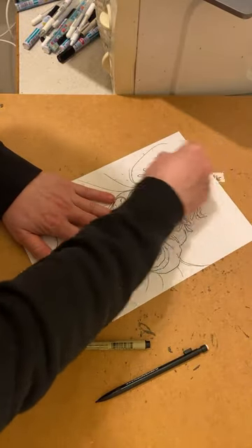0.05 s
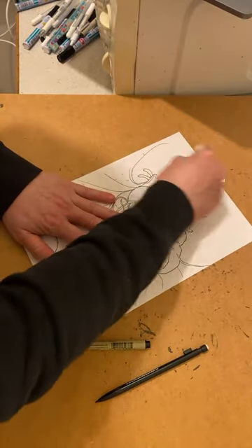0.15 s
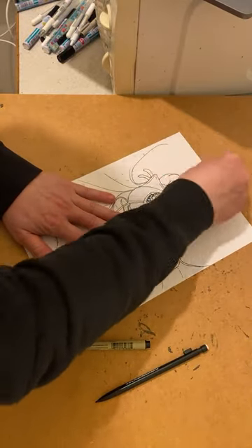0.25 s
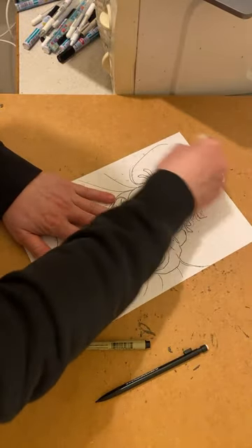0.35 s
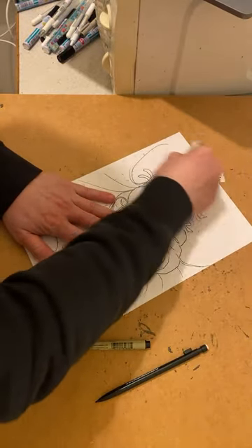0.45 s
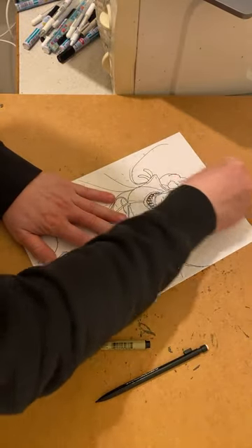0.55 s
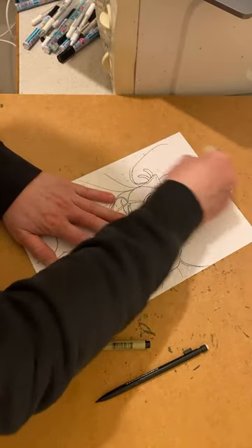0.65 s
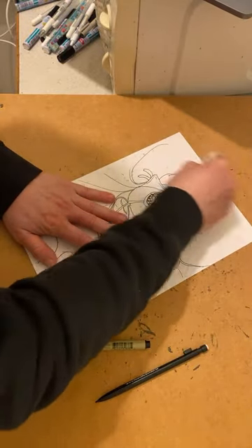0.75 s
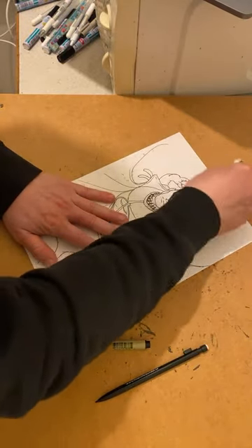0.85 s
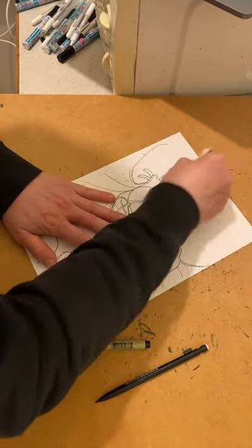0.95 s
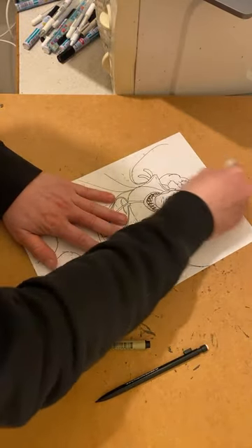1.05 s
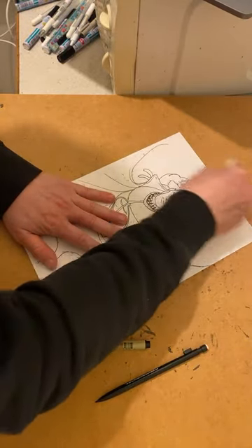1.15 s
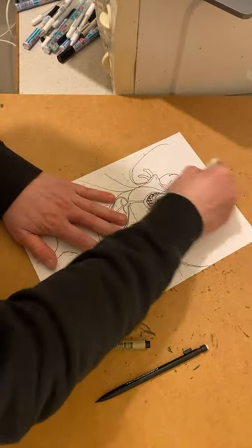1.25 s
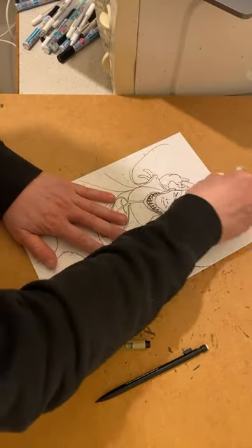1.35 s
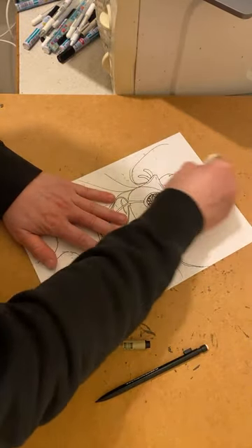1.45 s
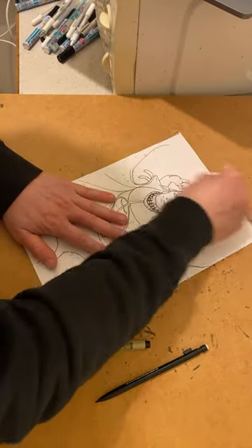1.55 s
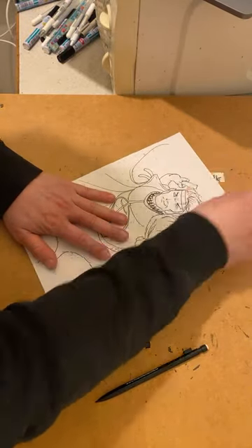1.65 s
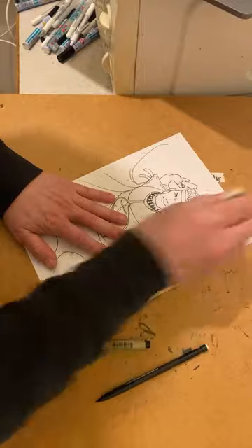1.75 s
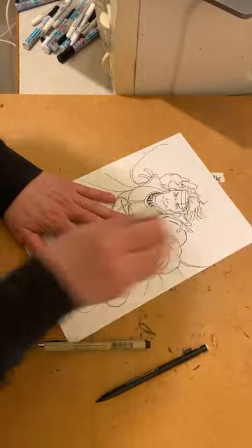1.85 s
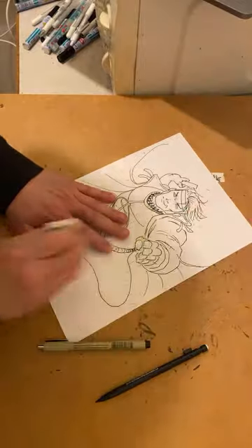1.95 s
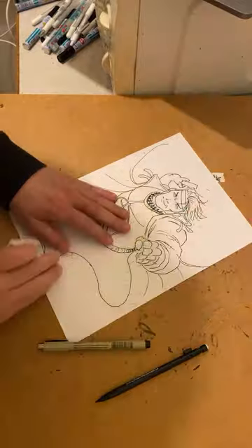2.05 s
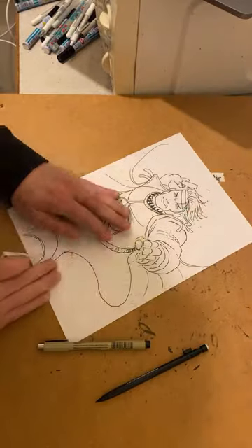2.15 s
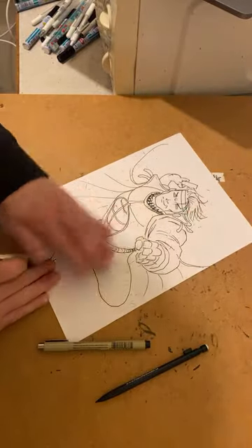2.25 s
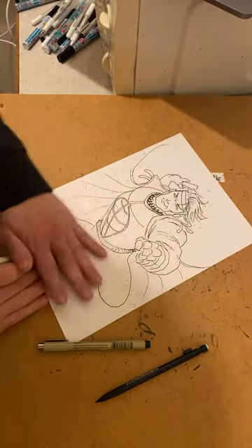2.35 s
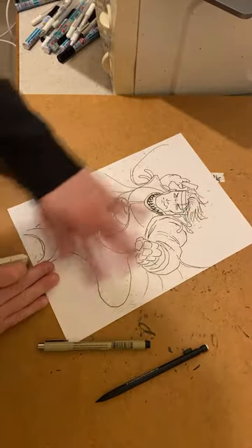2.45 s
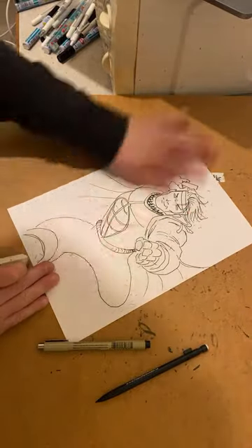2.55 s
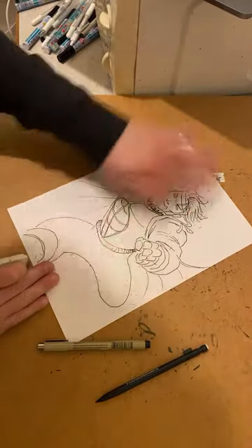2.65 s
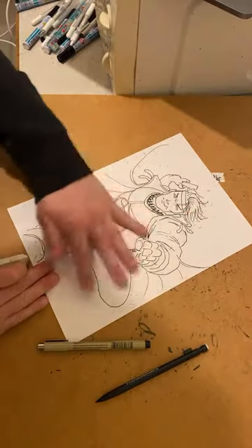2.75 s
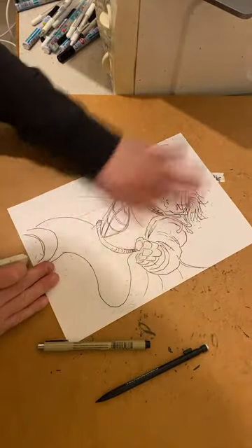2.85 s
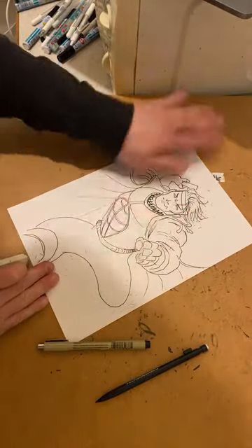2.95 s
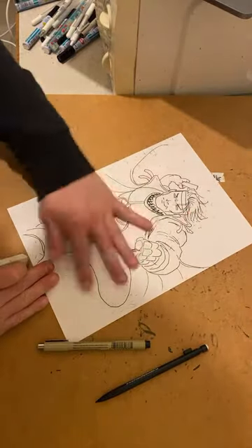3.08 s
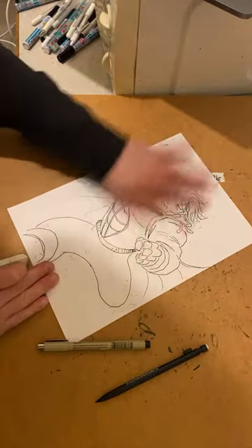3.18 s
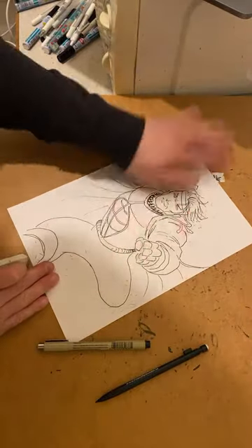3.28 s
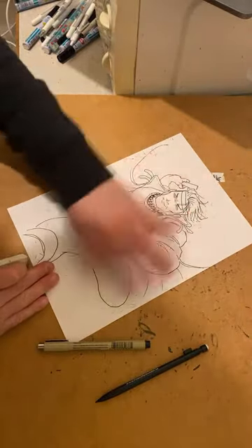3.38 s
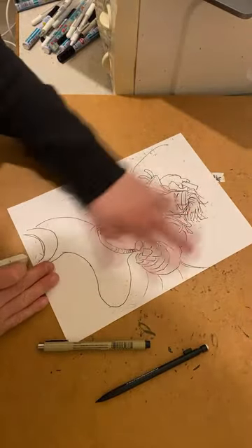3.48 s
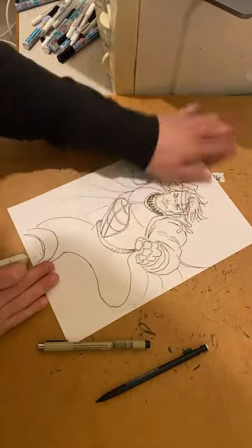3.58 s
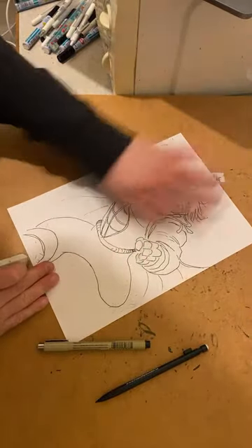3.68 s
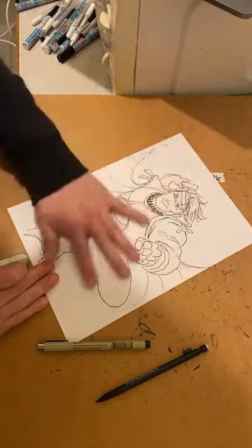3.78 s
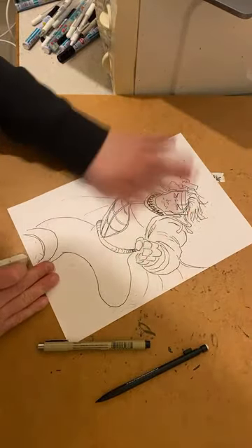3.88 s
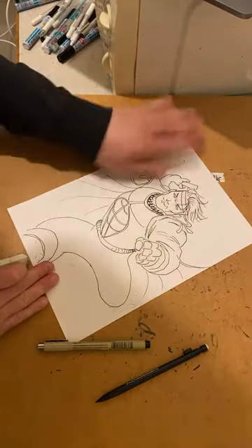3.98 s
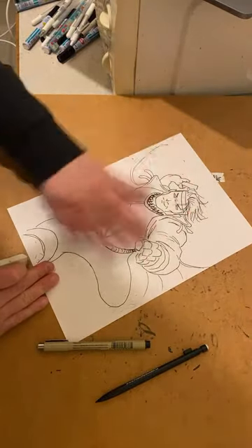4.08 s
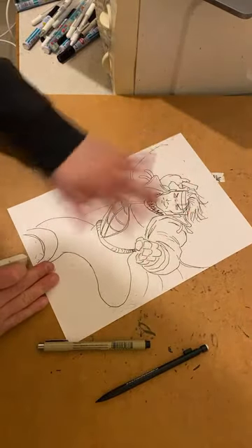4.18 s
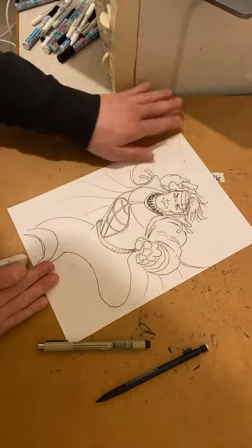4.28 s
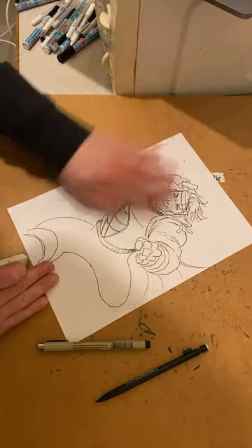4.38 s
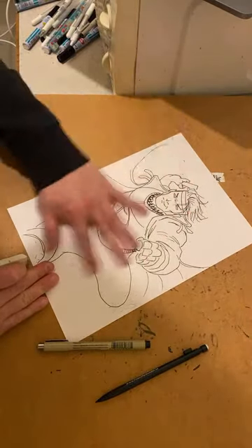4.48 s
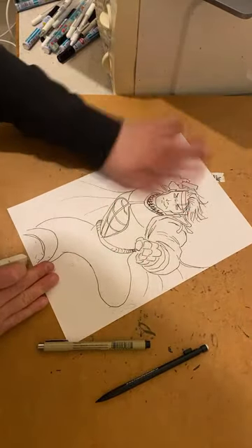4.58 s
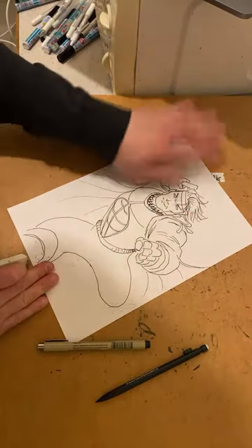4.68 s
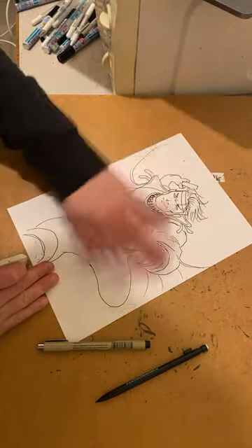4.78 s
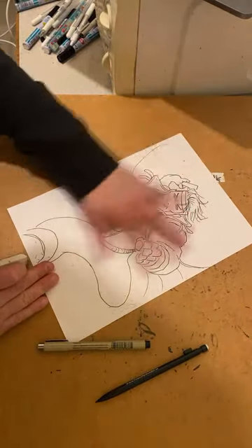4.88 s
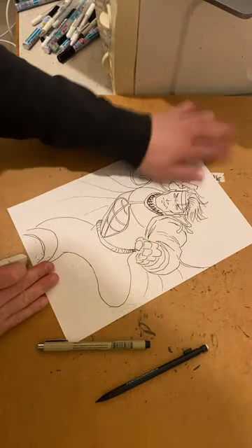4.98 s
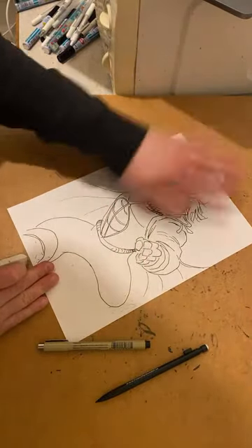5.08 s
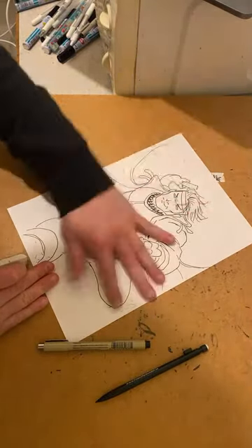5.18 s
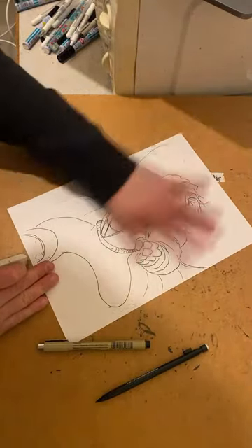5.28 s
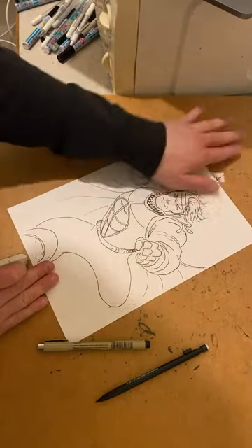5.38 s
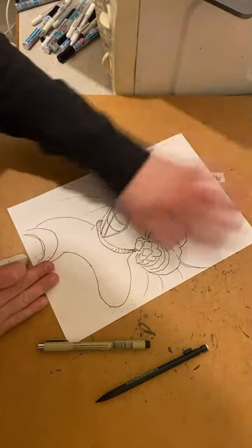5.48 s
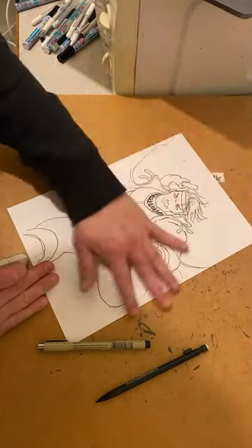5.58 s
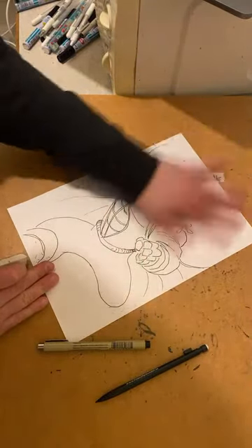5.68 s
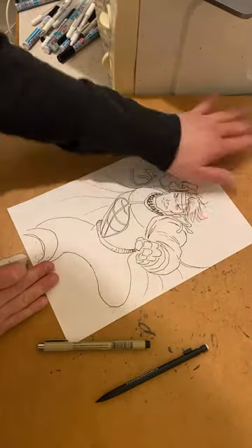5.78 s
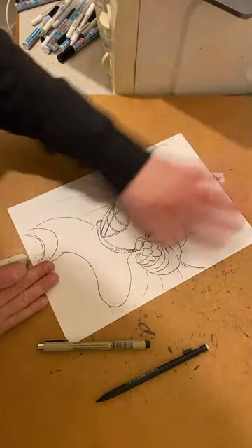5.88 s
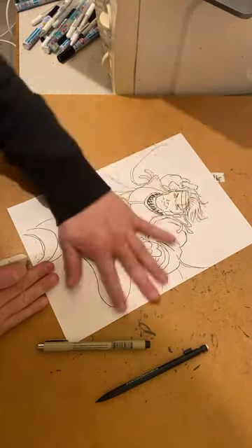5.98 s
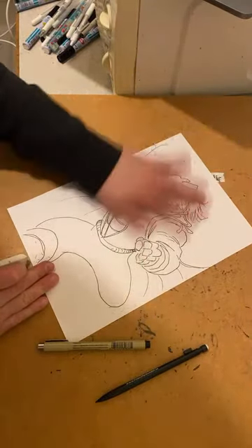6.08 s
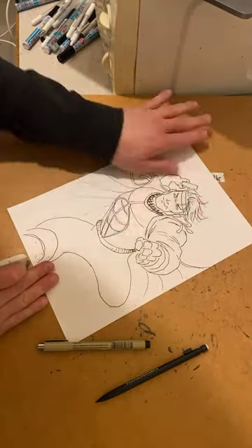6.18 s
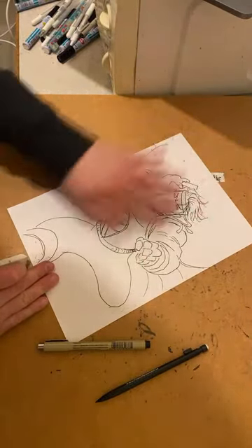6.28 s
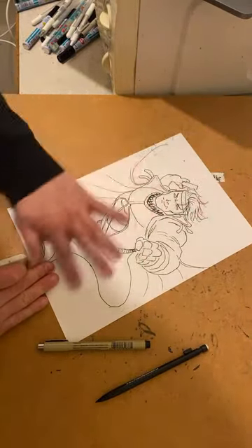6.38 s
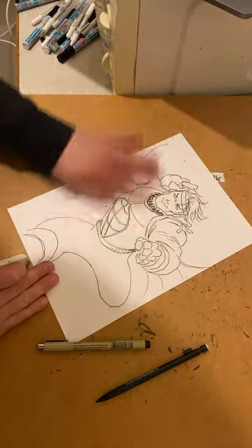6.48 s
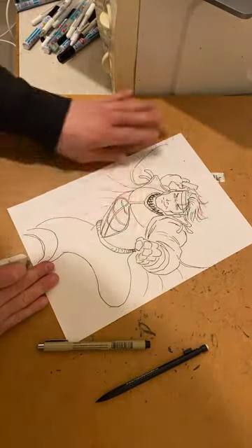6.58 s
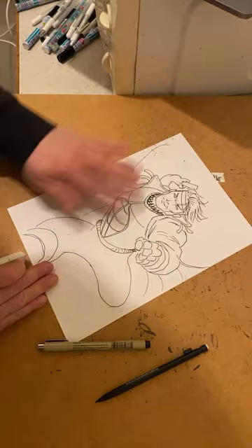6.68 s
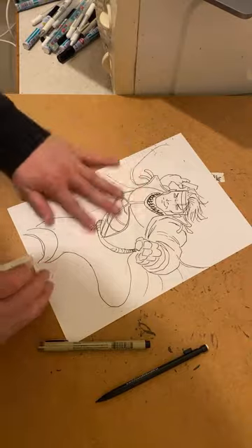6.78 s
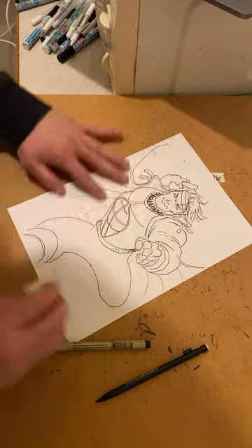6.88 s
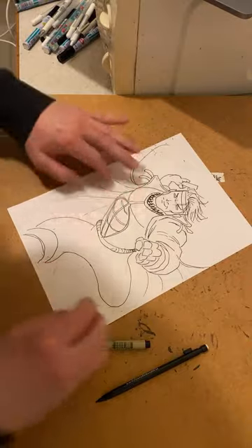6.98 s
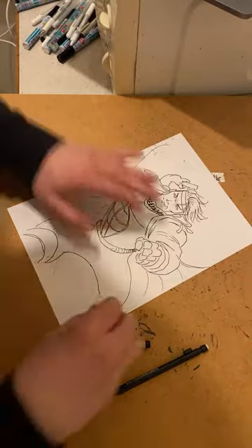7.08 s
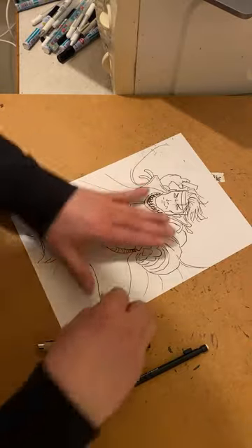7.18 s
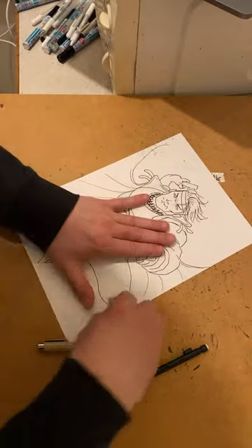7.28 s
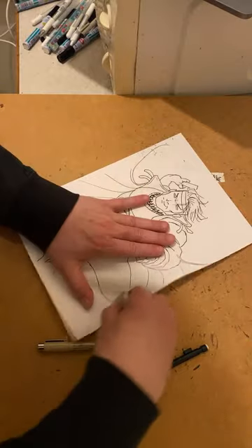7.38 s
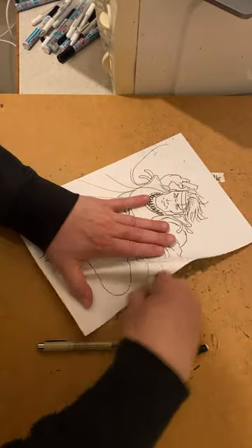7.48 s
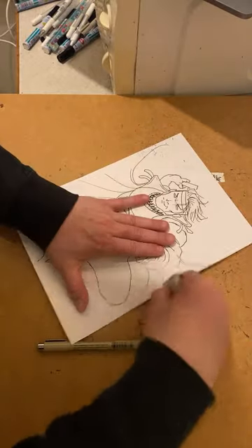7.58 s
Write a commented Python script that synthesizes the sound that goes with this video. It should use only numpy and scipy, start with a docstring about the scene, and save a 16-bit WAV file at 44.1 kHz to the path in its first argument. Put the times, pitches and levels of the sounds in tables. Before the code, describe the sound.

From the start, an eraser rubs over paper in about six quick, gritty strokes, each making the wooden desk knock and something loose rattle slightly. The sound cuts out for an instant near 0.8 and 1.5 seconds, returning with a low thump. At 1.6 seconds the sheet slips with a short rasp, and a faint tap follows at 2 seconds. From about 2.4 to 7 seconds a hand brushes across the paper roughly three times a second, each sweep a dry hiss, most starting with a soft pat and a low rumble from the desk. Another tiny dropout comes near 3.9 seconds. After a faint tap at 7.2 seconds, the hand lands on the sheet and slides it round, with a crisp scrape and buckle around 7.5 seconds. Everything is heard close up in a small, quiet room with a faint hum.

```python
"""A small, quiet room with a faint hum, heard in mono close to a wooden desk.
An eraser crosses drawing paper in six quick strokes; each bite is an impact that excites the desk's modes.
A hand then sweeps the crumbs away, landing softly and hissing over the sheet, and at last slides it round.
Rubber, skin and paper sound by stick-slip friction: noise whose level follows the speed of sliding.
Two light taps are heard. Three times the sound cuts out for an instant and comes back with a low thump."""
import sys
import numpy as np
from scipy import signal
from scipy.fft import rfft, irfft, next_fast_len
from scipy.io import wavfile
from scipy.ndimage import uniform_filter1d

SR = 44100
rng = np.random.default_rng(int(sys.argv[2]) if len(sys.argv) > 2 else 0)


def generate_wav(sig):
    """Save sig (samples, or channels by samples) to the path in sys.argv[1] as 16-bit PCM at SR."""
    pcm = np.round(np.clip(np.atleast_2d(sig).T, -1, 1) * 32767).astype(np.int16)
    wavfile.write(sys.argv[1], SR, pcm)


N = 336432
TIME = np.arange(N) / SR
AGE = np.arange(SR * 3 // 4) / SR  # time since the onset of one event [s]


# eraser strokes; the first is already dying away at time zero:
# (time [s], relative force [dB], time to full speed [s], relative rub level [dB])
ERASER_STROKES = [(-0.2, -3, 0.14, 4), (0.1232, -0.5, 0.14, 0.5), (0.4604, -.5, 0.08, 3),
                  (0.7494, -1, .09, 0), (1.0157, 2.5, .085, 0), (1.2666, -0.5, .09, -0.5),
                  (1.539, -2, 0.053, 1)]

def eraser_knocks(boom_db=-40.5, knock_db=-26, top_db=-40, hardening=1.56, clack_after_s=0.0085):
    """Impact excitation: each gritty bite rings the desk; contact stiffens with force, adding treble."""
    shared_top = desk_top(early_t60=0.55, late_t60=0.55, late_db=12)  # the bites fall near one spot
    clack, rattle = loose_object(clack_after_s)
    out = np.zeros(N)
    for s, force_db, _, _ in ERASER_STROKES:
        boom, knock = desk_modes(vary_db=1.1, damp_db_per_s=12)
        body = amp(boom_db) * unit_blow(boom) + amp(knock_db) * unit_blow(knock)
        top = unit_blow(shared_top + 0.5 * desk_top(early_t60=0.37, late_t60=0.44, late_db=23))
        grit = noise(RUBBER_SPECTRUM, len(AGE)) * np.exp(-AGE / 0.0031)
        top_gain = amp(top_db + hardening * force_db)
        add(out, s, amp(force_db) * body)
        add(out, s, top_gain * (top + amp(16) * clack + amp(-12) * grit))
        add(out, s + clack_after_s, top_gain * amp(-3) * rattle)
    return out


# normal modes of the desk: (frequency [Hz], relative level [dB], 60 dB decay time [s])
DESK_MODES = [(97.8, -17.5, 0.2), (118.2, -16, 0.63), (158, -11.5, 0.23), (169.2, -34, 0.94),
              (258.2, -20.5, 0.23), (278.7, -22, 0.36), (320.3, -6, 0.16), (331.3, -26, 0.78),
              (348.3, -16.5, 0.45), (374, -18, 0.44), (406, -5.5, 0.027), (410.7, -20.5, 0.52),
              (434.7, -27.5, 0.95), (439.9, -0.5, 0.1), (467, -19.5, 0.47), (489, -23, 0.46),
              (491, -22, 0.63), (547, -23.5, 0.5), (606.6, -30, 0.33)]

def desk_modes(soft_db_per_octave=0, vary_db=0, damp_db_per_s=0):
    """Modal superposition: damped sines form a boom and a knock; a leaning arm adds damping."""
    hz, db, t60 = np.transpose(DESK_MODES)[:, :, None]
    db = db + vary_db * rng.standard_normal(db.shape)  # each spot favours other modes
    sign = (-1) ** np.arange(len(hz))[:, None]  # neighbours swing opposite ways, so the ring builds up
    decay = amp(db - soft_db_per_octave * np.log2(hz) - (60 / t60 + damp_db_per_s) * AGE)
    rise = 1 - np.exp(-AGE * hz)  # about one cycle
    modes = sign * rise * decay * np.sin(2 * np.pi * hz * AGE)
    low = hz[:, 0] < 200
    return modes[low].sum(0), modes[~low].sum(0)


# crowded upper modes of the desk: (frequency [Hz], relative spectral density [dB])
DESK_TOP_SPECTRUM = [(450, -7), (620, 2), (800, 6), (950, 0), (1200, 2.5), (1550, -2.5), (1950, -8),
                     (2500, -14), (3500, -22.5), (5500, -29.5), (9000, -56), (16000, -55)]

def desk_top(early_t60, late_t60, late_db):
    """Modal overlap: dense modes merge into noise, with an early fall and a late ring in the room."""
    fall = amp(-60 * AGE / early_t60) + amp(late_db - 60 * AGE / late_t60)
    rise = 1 - np.exp(-AGE / 0.00055)
    return unit_blow(noise(DESK_TOP_SPECTRUM, len(AGE)) * fall * rise)


# something loose on the desk: (frequency [Hz], relative spectral density [dB])
RATTLE_SPECTRUM = [(850, -35), (1150, 0), (1350, -3), (1550, 0), (1750, -6), (2100, -25), (4000, -50),
                   (8000, -80)]

def loose_object(clack_after_s, clack_hz=1250, clack_s=0.0013, rattle_t60=0.06):
    """Contact chatter: a jolted object gives a delayed clack and a brief rattle."""
    clack = np.exp(-((AGE - clack_after_s) / clack_s) ** 2) * np.sin(2 * np.pi * clack_hz * AGE)
    envelope = np.minimum(AGE / 0.002, 1) * amp(-60 * AGE / rattle_t60)
    return clack, unit_blow(noise(RATTLE_SPECTRUM, len(AGE)) * envelope)


# rubber on paper: (frequency [Hz], relative spectral density [dB])
RUBBER_SPECTRUM = [(300, -33), (900, 14.5), (2000, 3.5), (3200, 0.5), (5000, 1), (7000, -3.5), (10000, -4),
                   (13000, -7.5), (16000, -10)]

def eraser_rub(level_db=-54.5):
    """Sliding friction: after each bite the rubber radiates power as the square of its speed."""
    power = np.zeros(N)
    for s, _, peak_s, rub_db in ERASER_STROKES:
        speed = stroke(peak_s, start_db=-12, stop_s=0.055)
        add(power, s, (amp(level_db + rub_db) * speed) ** 2)
    return lingering(power, share=0.47, t60=0.31) * friction(RUBBER_SPECTRUM, grain_db=3, flutter_db=0)


# skin on paper, and the hollow rush under the palm: (frequency [Hz], relative spectral density [dB])
SKIN_SPECTRUM = [(400, -0.5), (900, -6), (1800, -2.5), (3000, -0.5), (4800, 1), (6500, -1.5), (8500, 0.5),
                 (11000, -0.5), (13500, -2), (16000, -7)]
PALM_SPECTRUM = [(300, -12), (600, -8), (850, 1.5), (1250, 4), (1700, 2.5), (2400, -1), (4000, -7)]
# sweeps of the hand, in relative levels; a landing of -40 dB or less glides in with no audible pat:
# (time [s], time to full speed [s], hiss [dB], landing [dB], weight on the palm [dB])
HAND_SWEEPS = [(1.92, .18, -16.5, -40, -1.5), (2.372, .18, 0.5, -57, 8), (2.818, 0.069, 1.5, 4, 0.5),
               (3.125, .1, 0.5, -3.5, 0), (3.464, 0.093, 0, -2, 5), (3.809, .11, -2, 6, -2),
               (4.166, 0.079, -1, -0.5, -3.5), (4.498, 0.1, -2, -5.5, -1.5),
               (4.871, 0.093, -0.5, -1.5, -1.5), (5.234, 0.11, 0, -0.5, 0), (5.64, 0.077, -.5, -1.5, 3),
               (6.018, 0.11, -3, .5, 6), (6.425, 0.069, -2, -8, 2), (6.804, 0.079, -8, 7, -8)]
BOOM_PER_LANDING = 0.46  # growth of the desk's boom with the landing [dB per dB]

def hand_sweeps(level_db=-44, contact_db=-13.5, rush_per_weight=0.78, rumble_per_weight=0.67):
    """Friction under load: skin hisses, a heavier palm adds a rush, and the driven desk rumbles."""
    skin, palm, drag = np.zeros((3, N))
    for s, peak_s, hiss_db, landing_db, weight_db in HAND_SWEEPS:
        start_db = np.clip(contact_db + 0.83 * landing_db, -29.5, 0)  # a harder landing starts faster
        slide = amp(level_db + hiss_db) * stroke(peak_s, start_db, stop_s=0.065)
        load_db = level_db - 3 + BOOM_PER_LANDING * landing_db + rumble_per_weight * weight_db
        add(skin, s, slide ** 2)
        add(palm, s, (slide * amp(rush_per_weight * weight_db - 3)) ** 2)
        add(drag, s, (amp(load_db) * stroke(peak_s=0.057, start_db=contact_db, stop_s=0.059)) ** 2)
    hiss = lingering(skin) * friction(SKIN_SPECTRUM, grain_db=2, flutter_db=-0.1)
    rush = lingering(palm) * friction(PALM_SPECTRUM, grain_db=1, flutter_db=2)
    boom, _ = desk_modes()
    rumble = lingering(drag) * unit(signal.fftconvolve(rng.standard_normal(N), boom)[:N])
    return hiss + rush, rumble


# the pat of flesh on paper: (frequency [Hz], relative spectral density [dB])
PAT_SPECTRUM = [(170, -21), (250, 3), (320, 12), (420, -12), (560, -1), (750, -13.5), (1000, -9.5),
                (2000, -43)]
# the hand is set down to hold the sheet: (time [s], relative landing [dB], relative weight [dB])
HAND_HOLDS = [(2.208, -15.5, 2.5), (7.318, -7, 0), (7.347, 9, -7)]

def hand_landings(boom_db=-47.5, knock_db=-50.5, top_db=-55.5, pat_db=-48.5):
    """Compliant impact: flesh cushions the blow, the fingers patter, and the weight rocks the desk."""
    graze_s, finger_spread_s, heel_s = 0.00402, 0.02237, 0.0054
    landings = [(s + graze_s, landing_db, weight_db) for s, _, _, landing_db, weight_db in HAND_SWEEPS]
    out = np.zeros(N)
    for s, landing_db, weight_db in landings + list(HAND_HOLDS):
        boom, knock = desk_modes(soft_db_per_octave=3, vary_db=4.5, damp_db_per_s=20)
        patter = knock.copy()
        for delay, size in rng.random((4, 2)):
            add(patter, delay * finger_spread_s, 0.4 * size * knock)
        give = 1 - np.exp(-AGE / (0.0085 * amp(-landing_db)))  # gentle landings flatten flesh slowly
        pat = unit_blow(noise(PAT_SPECTRUM, len(AGE)) * give * amp(-60 * AGE / 0.38))
        top = unit_blow(give * desk_top(early_t60=0.25, late_t60=0.69, late_db=-10.5))
        touch = amp(knock_db) * unit_blow(give * patter) + amp(pat_db) * pat + amp(top_db) * top
        add(out, s, amp(landing_db) * touch)
        add(out, s + heel_s, amp(boom_db + BOOM_PER_LANDING * landing_db + weight_db) * unit_blow(boom))
    return out


# paper scraping on wood, and paper buckling: (frequency [Hz], relative spectral density [dB])
SCRAPE_SPECTRUM = [(300, -9), (900, -1), (1600, -1), (2200, -5.5), (2900, 0.5), (3400, 0.5), (4200, -3.5),
                   (4700, -1.5), (5200, 0.5), (6200, -3), (8000, -4.5), (10500, -9.5), (13000, -10.5),
                   (16000, -20)]
BUCKLE_SPECTRUM = [(1500, -30), (2400, -18), (2900, 6), (3500, -7), (4200, 2), (4700, -5), (5300, 1),
                   (6200, -14), (10000, -24)]
# the sheet slips under the last stroke, then is pulled round; a curve each: (time [s], relative level [dB])
SLIDE_CURVES = [
    [(1.56, -68), (1.578, -60), (1.63, -47.5), (1.758, -67.5), (1.85, -78)],
    [(7.29, -91), (7.32, -71), (7.398, -79), (7.424, -54), (7.454, -42.5), (7.494, -42.5), (7.532, -47),
     (7.629, -51)],
]
# the sheet buckles under the eraser, and as its edge lifts: (time [s], level [dB])
SHEET_BUCKLES = [(1.612, -48.5), (7.41, -48), (7.447, -38.5)]

def sheet_slips(scrape_gain_db=5, buckle_rise_s=0.0048, buckle_t60=0.24):
    """Friction and buckling: the sheet scrapes over the wood and rasps where it gives way."""
    sliding, buckling = np.zeros((2, N))
    for curve in SLIDE_CURVES:
        s, db = np.transpose(curve)
        sliding += amp(scrape_gain_db + np.interp(TIME, s, db)) * (TIME > s[0]) * (TIME < s[-1])
    for s, db in SHEET_BUCKLES:
        add(buckling, s, np.minimum(AGE / buckle_rise_s, 1) * amp(db - 60 * AGE / buckle_t60))
    scrape = sliding * friction(SCRAPE_SPECTRUM, grain_db=1, flutter_db=1.3)
    rasp = buckling * friction(BUCKLE_SPECTRUM, grain_db=2, flutter_db=1.2)
    return scrape + rasp


# light taps of the eraser in the fingers: (time [s], centre frequency [Hz], level [dB])
FINGER_TAPS = [(2.005, 1247, -61), (7.197, 1450, -65.5)]

def eraser_taps(t60=0.17):
    """Damped resonance: each dry tap is a band of noise that dies quickly."""
    out = np.zeros(N)
    for s, hz, db in FINGER_TAPS:
        band = [(hz / 3, -30), (hz, 0), (hz * 2, -16), (hz * 5, -50)]
        add(out, s, amp(db) * unit_blow(noise(band, len(AGE)) * amp(-60 * AGE / t60)))
    return out


# a thump and a click after each dropout: (time [s], thump gain [dB], click gain [dB])
DROPOUT_THUMPS = [(0.802, -35, -67), (1.5451, -26, -36), (3.862, -59, -62)]

def dropout_thumps(thump_s=0.0021, click_s=0.00037):
    """Step transient: a low thump and a tiny click as the sound comes back after cutting out."""
    phase = AGE / thump_s
    thump = (1 - phase / 2) * phase * np.exp(1 - phase)
    out = np.zeros(N)
    for s, thump_db, click_db in DROPOUT_THUMPS:
        click = rng.standard_normal(len(AGE)) * np.exp(-AGE / click_s)
        add(out, s, amp(thump_db) * thump + amp(click_db) * click)
    return out


def early_echoes(x, echo_db=-11, t60=0.054, drift_hz=1.7):
    """Interference: reflections drift between two patterns as the hand moves, conserving mean power."""
    t = AGE[:SR // 20]
    echoes = rng.standard_normal((2, len(t))) * amp(-60 * t / t60) * (t > 0.001)
    first, second = (signal.fftconvolve(x, e / np.linalg.norm(e))[:N] for e in echoes)
    turn = 2 * np.pi * drift_hz * TIME
    wet = np.cos(turn) * first + np.sin(turn) * second
    return (x + amp(echo_db) * wet) / np.sqrt(1 + amp(echo_db) ** 2)


def lingering(power, share=0.6, t60=0.37):
    """Reverberation: a share of the power decays exponentially in the room; returns the amplitude."""
    keep = np.exp(-2 * np.log(1000) / (t60 * SR))
    stored = signal.lfilter([1 - keep], [1, -keep], power)
    return np.sqrt((1 - share) * power + share * stored)


# the room at rest: (frequency [Hz], relative spectral density [dB])
ROOM_SPECTRUM = [(15, -39), (25, -41), (97, 0), (123, -3.5), (166, -8), (200, -9), (427, -7.5), (560, -13),
                 (695, -16), (911, -15.5), (1040, -19.5), (5140, -30.5), (10700, -36), (16000, -49)]
# its hum: (frequency [Hz], level [dB])
HUM_TONES = [(48.4, -74.5), (148.5, -63.5)]

def room_tone(noise_db=-62.5, waver=0.5):
    """Random modulation: a hum wavers in amplitude and phase over a steady noise floor."""
    slow = [(3, 0), (12, -40), (100, -120)]
    hum = np.zeros(N)
    for hz, db in HUM_TONES:
        level = amp(db) * np.sqrt(2) * (1 + waver * noise(slow))
        hum += level * np.sin(2 * np.pi * hz * TIME + waver * noise(slow))
    return amp(noise_db) * noise(ROOM_SPECTRUM) + hum


def friction(spectrum, grain_db, flutter_db):
    """Stick-slip: countless paper fibres catch and let go in small clumps, under wavering pressure."""
    clumps = unit(uniform_filter1d(rng.standard_normal(N), size=24))
    pressure = unit(uniform_filter1d(rng.standard_normal(N), size=600))
    slips = rng.standard_normal(N) * amp(grain_db * clumps + flutter_db * pressure)
    return unit(colour(slips, spectrum))


def stroke(peak_s, start_db, stop_s, contact_s=0.0053):
    """Velocity envelope: sudden contact at start_db, a swell to full speed, then a smooth stop."""
    swell = amp(start_db * np.maximum(1 - AGE / peak_s, 0) ** 2)
    stop = np.exp(-(np.maximum(AGE - peak_s, 0) / stop_s) ** 2)
    return np.minimum(AGE / contact_s, 1) * swell * stop


def colour(x, spectrum):
    """Spectral shaping by (frequency [Hz], gain [dB]) points on a log-frequency axis."""
    size = next_fast_len(len(x) + 2048)
    hz, db = np.transpose(spectrum)
    gain_db = np.interp(np.log(np.fft.rfftfreq(size, 1 / SR) + 1), np.log(hz + 1), db)
    return irfft(rfft(x, size) * amp(gain_db), size)[:len(x)]


def noise(spectrum, size=N):
    """Filtered Gaussian noise of rms 1."""
    return unit(colour(rng.standard_normal(size), spectrum))


def amp(db):
    """Decibels to amplitude ratio."""
    return 10 ** (np.asarray(db) / 20)


def unit(x):
    """Normalisation to rms 1."""
    return x / np.sqrt(np.mean(x ** 2) + 1e-20)


def unit_blow(x):
    """Normalisation of a blow to rms 1 over its first 40 ms."""
    return x / np.sqrt(np.mean(x[:SR // 25] ** 2) + 1e-20)


def add(mix, s, sound):
    """Superposition of a sound on the mix at time s."""
    start = round(s * SR)
    sound = sound[max(-start, 0):]
    part = mix[max(start, 0):][:len(sound)]
    part += sound[:len(part)]


def scene():
    """Linear superposition of friction, transients and room tone, the same in both ears."""
    sweeps, rumble = hand_sweeps()
    rubbing = early_echoes(eraser_rub() + sweeps + sheet_slips())
    transients = eraser_knocks() + hand_landings() + eraser_taps() + dropout_thumps()
    mono = rubbing + transients + rumble + room_tone()
    return np.array([mono, mono])


# instants at which the sound cuts out: (time [s], duration [s])
DROPOUTS = [(0.794, 0.0045), (1.5153, 0.008), (3.8545, 0.0065)]

def record(dry, ceiling=0.16, cutoff_hz=15850):
    """Saturation rounds the peaks, a gate cuts the sound three times, and a low-pass limits the band."""
    rounded = dry / (1 + (dry / ceiling) ** 6) ** (1 / 6)
    gate = np.ones(N)
    for s, length in DROPOUTS:
        gate[(TIME > s) & (TIME < s + length)] = 0
    gated = rounded * uniform_filter1d(gate, size=30)
    low_pass = signal.firwin(1023, cutoff_hz, window=("kaiser", 9), fs=SR)
    return signal.oaconvolve(gated, low_pass[None], "same")


dry = scene()
out = record(dry)
generate_wav(out)
```